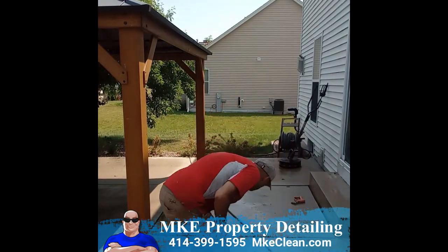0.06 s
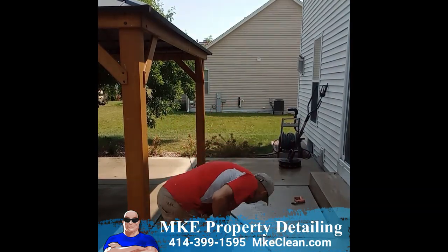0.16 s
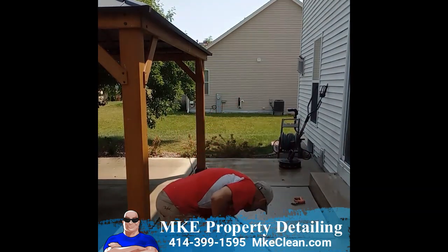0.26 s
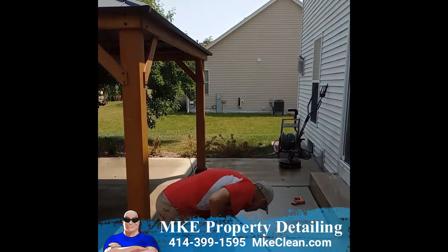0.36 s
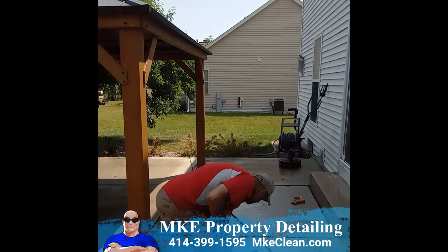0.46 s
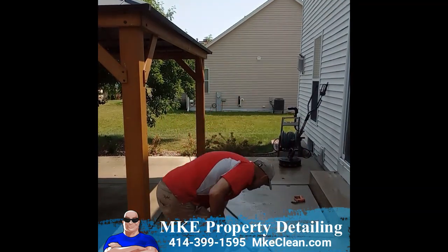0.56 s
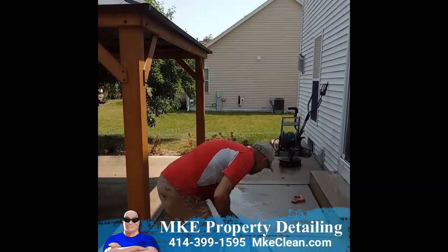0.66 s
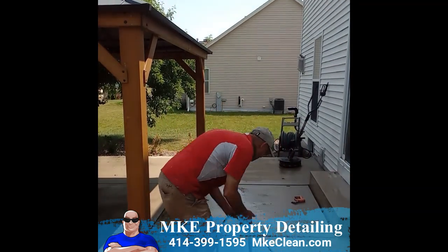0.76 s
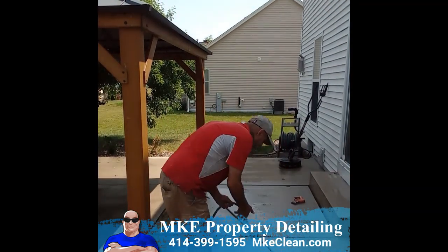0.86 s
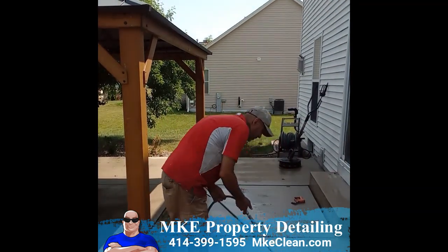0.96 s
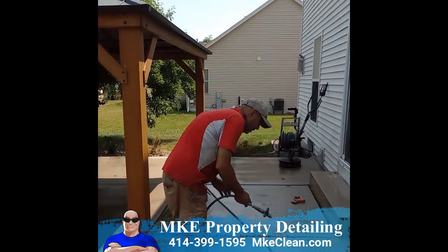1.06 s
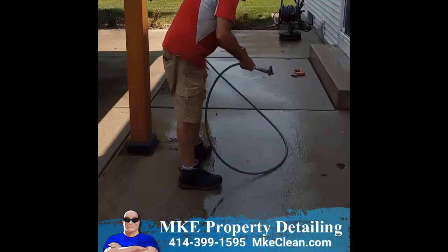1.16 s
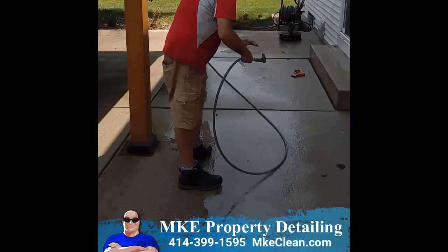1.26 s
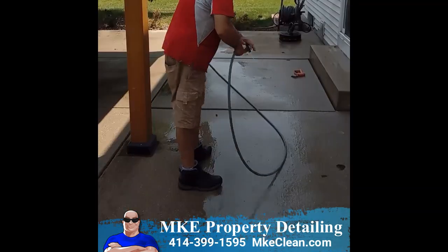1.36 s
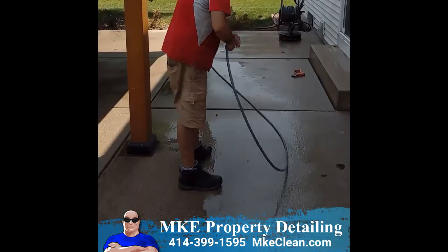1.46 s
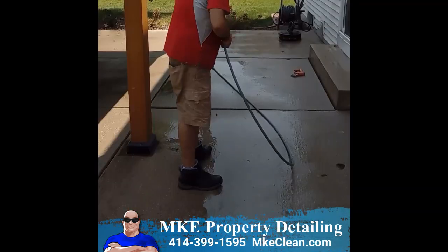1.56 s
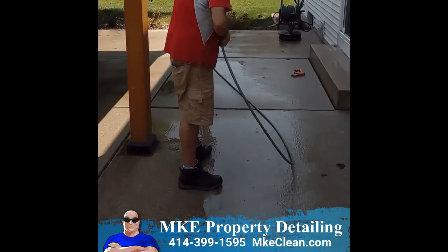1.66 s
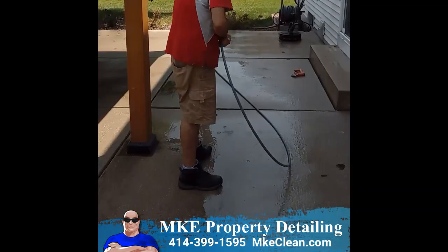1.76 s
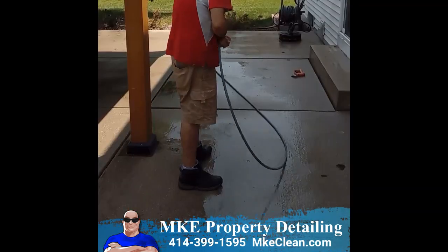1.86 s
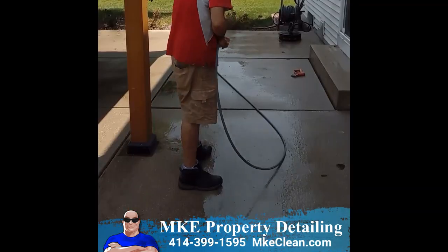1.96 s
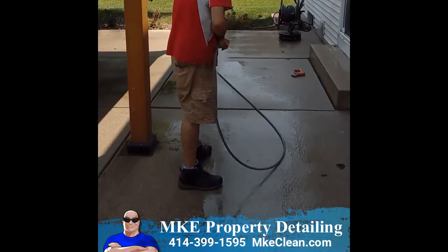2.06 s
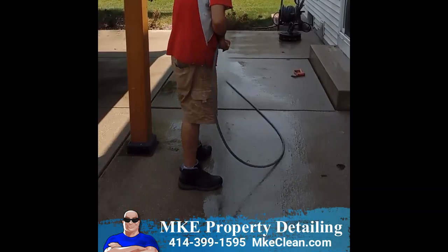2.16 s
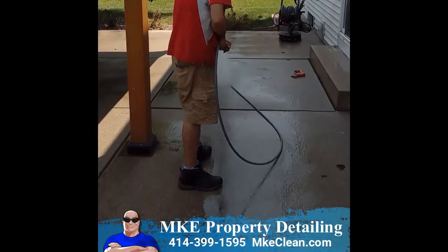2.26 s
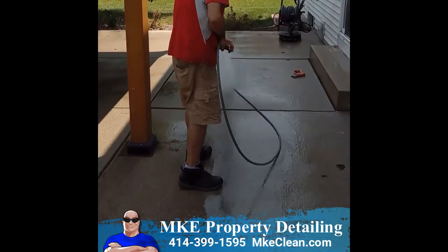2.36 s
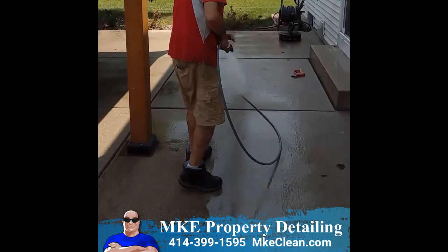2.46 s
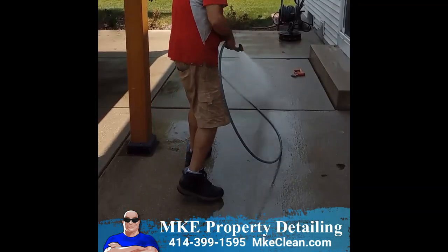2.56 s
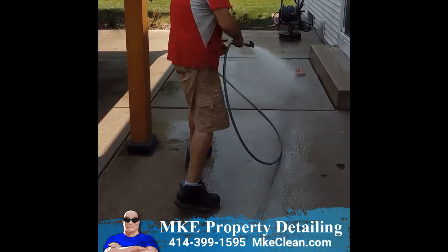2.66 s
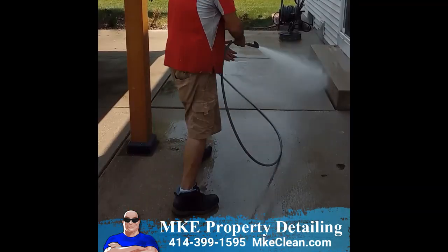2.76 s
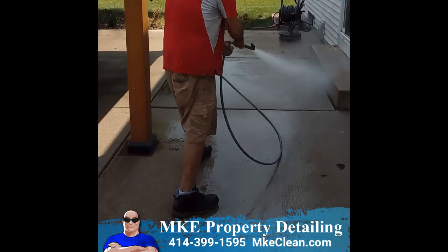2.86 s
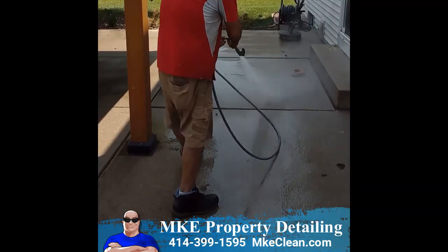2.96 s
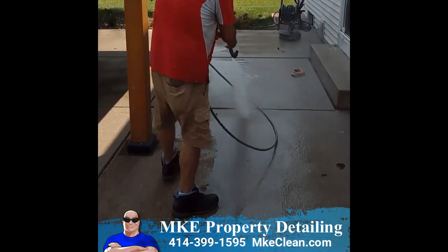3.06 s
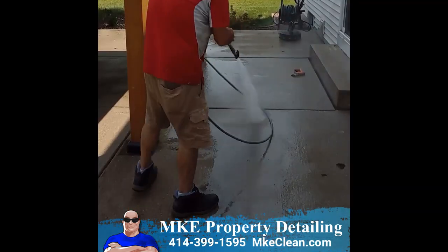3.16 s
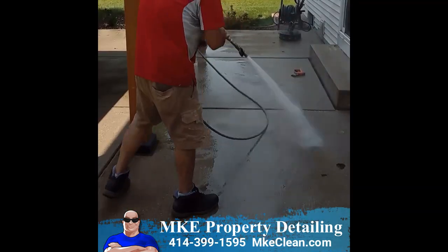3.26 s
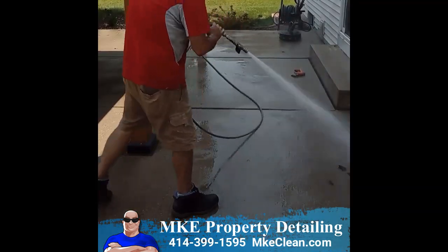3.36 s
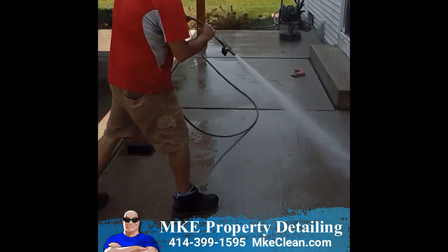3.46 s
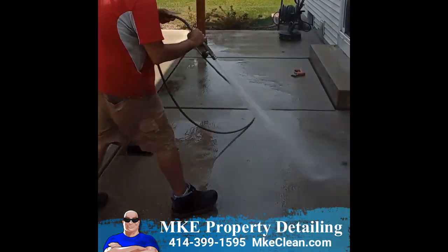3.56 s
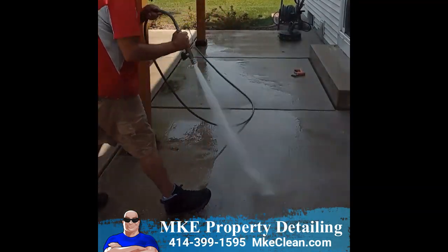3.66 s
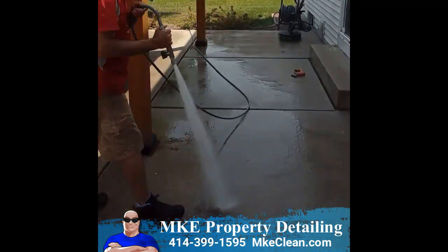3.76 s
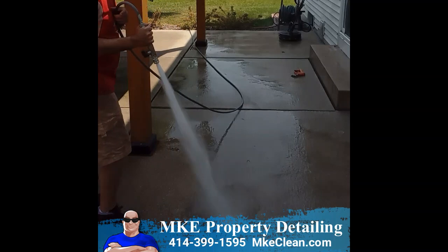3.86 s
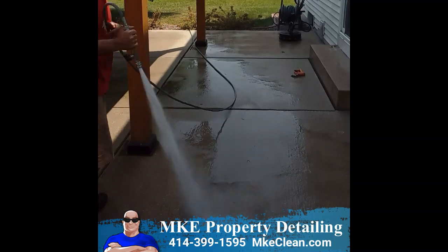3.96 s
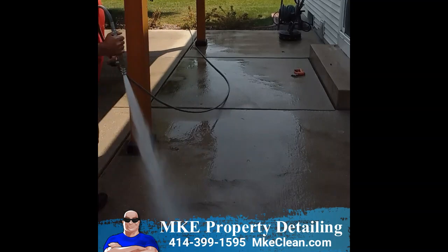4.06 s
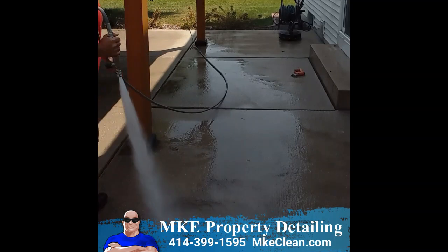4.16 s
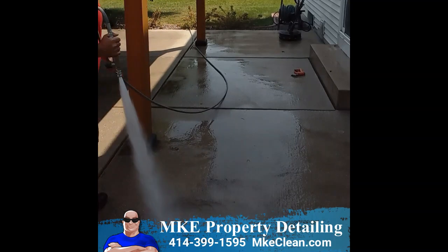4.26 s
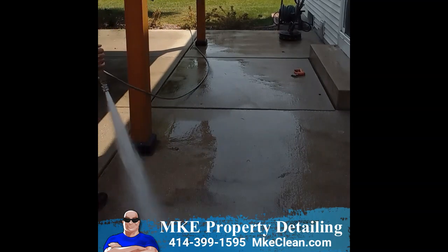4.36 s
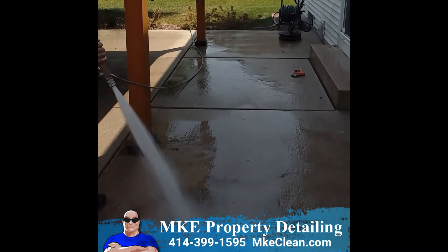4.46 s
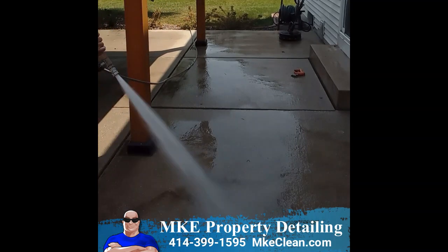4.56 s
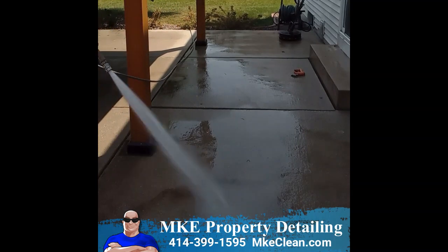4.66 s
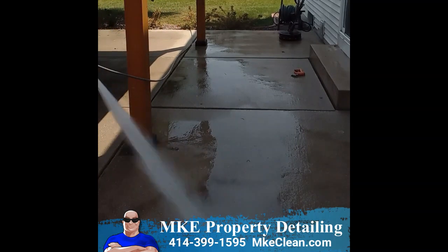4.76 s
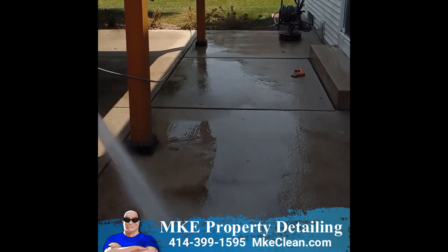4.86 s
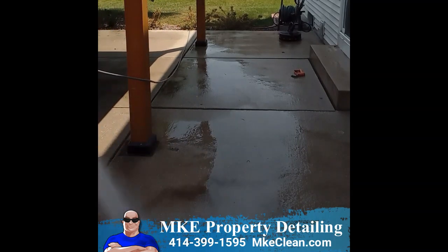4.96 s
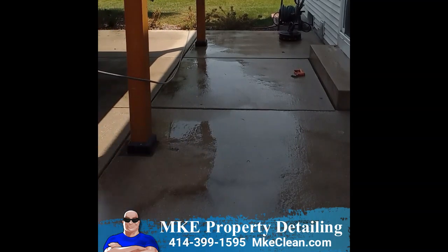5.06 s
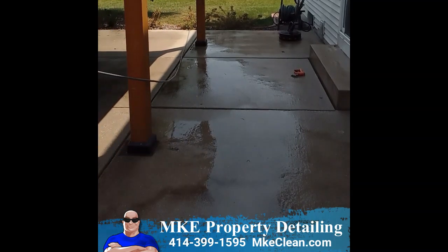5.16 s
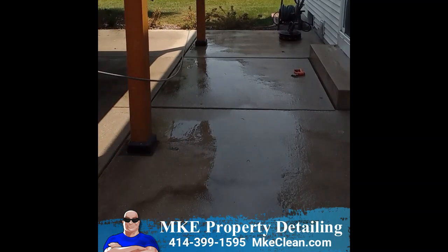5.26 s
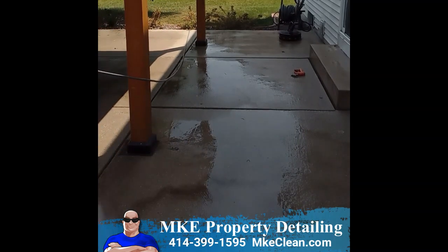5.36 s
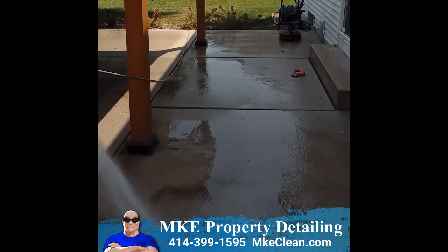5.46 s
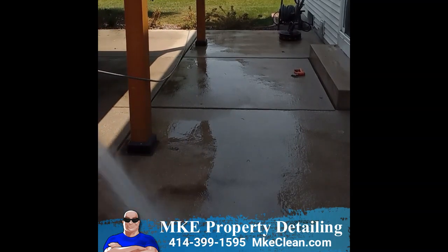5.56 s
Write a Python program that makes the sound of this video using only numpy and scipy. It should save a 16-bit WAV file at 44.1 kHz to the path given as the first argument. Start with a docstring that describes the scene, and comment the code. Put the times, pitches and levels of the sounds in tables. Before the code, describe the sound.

Wind thumps and knocks on a microphone over a soft water hiss, then a hose jet bursts open and sprays a concrete patio.

```python
"""A wet concrete patio outdoors, rinsed by a spray gun on a hose: a soft hiss, then the full jet opens and sweeps the slab.
The water is noise mixed with single impacts, coloured as nozzle hiss, splash, mist and a deep drumming.
Delayed copies off the ground, a wall and a post make the spray sound hollow as the nozzle moves.
Gusts of low noise and single swings knock on the two microphone ports; a faint motor of three sines hums
far away, and short puffs of noise are scuffs close by."""
import sys
import numpy as np
from scipy import signal
from scipy.fft import rfft, irfft, next_fast_len
from scipy.io import wavfile
from scipy.ndimage import uniform_filter1d, map_coordinates

SR = 44100
rng = np.random.default_rng(int(sys.argv[2]) if len(sys.argv) > 2 else 0)


def transcribe(u):
    """Save the signal u as a 16-bit wav file named by the first command-line argument.

    u: samples, shape (n,) or (channels, n), limited to [-1, 1]; the rate is SR.
    q: integer samples, one column per channel.
    """
    v = np.clip(np.atleast_2d(u).T, -1, 1)
    q = np.round(v * 32767).astype(np.int16)
    wavfile.write(sys.argv[1], SR, q)


N = 247842

# Colour of the outdoor air. Each row: frequency in Hz, relative level in dB per Hz.
AIR_COLOUR = [(20, -54), (100, -6), (300, -7), (700, -6), (2000, -23), (15000, -28.5)]
# Tones of the far motor. Each row: frequency in Hz, rms level in dB.
MOTOR_TONES = [(179, -60.5), (298, -61.5), (417, -61)]
# Brief scuffs close by. Each row: middle in seconds, length in seconds, level in dB, pitch in Hz.
SCUFFS = [(0.005, 0.019, -35, 597), (0.037, 0.049, -42.5, 760), (0.056, 0.039, -43, 534),
          (0.267, .016, -32, 600), (0.452, 0.0218, -42, 740), (0.467, 0.0134, -49, 834)]

# The breeze between gusts, before its lumps and left-right offset. Each row: time in seconds, level in dB.
BREEZE_LEVEL = [(0, -37), (.4, -28.5), (.55, -41.5), (1.2, -31), (1.45, -47.5), (2.6, -51.5), (3.0, -75),
                (5.62, -59)]
# Colour of the breeze. Each row: frequency in Hz, relative level in dB per Hz.
BREEZE_COLOUR = [(20, -32), (45, -12), (75, 6.5), (130, 5.5), (220, -13.5), (400, -28), (1000, -68)]
# Gusts of wind. Each row: start in seconds, length in seconds, left level in dB, right level in dB.
GUSTS = [(.1, 0.13, -23.5, -49), (0.238, 0.056, -15.5, -30), (0.278, 0.073, -26.5, -25),
         (0.383, 0.13, -18, -31.5), (0.59, 0.11, -22, -26), (0.692, .11, -36, -22),
         (0.874, 0.095, -29, -21.5), (0.926, 0.16, -48, -17), (1.132, 0.11, -24, -32),
         (1.242, 0.14, -28, -43), (1.796, .045, -36, -53), (2.083, 0.061, -32.5, -58),
         (2.159, 0.059, -29.5, -58), (2.389, 0.14, -29.5, -39), (2.647, 0.088, -31.5, -41),
         (2.787, 0.041, -25.5, -42), (4.99, 0.043, -37.5, -60)]
# The hardest eddies, each a single knock. Each row: middle in seconds, pitch of the swing in Hz,
# strength in dB before the swing is shaped, share on the right port from 0 to 1.
KNOCKS = [(0.265, 260, -2, 0.076), (0.413, 110, -13, 0.94), (0.441, 287, -7, 0.022), (.736, 292, -17.5, 1),
          (0.815, 130, -9.5, 1), (.998, 179, -8, 1), (2.381, 197.5, -3.5, 0.01), (2.427, 240, -12, 0)]

# Water drumming on the slab as the jet comes near. Each row: time in seconds, level in dB.
DRUMMING_LEVEL = [(0, -67), (2.0, -58), (2.3, -78), (3.2, -53), (3.8, -47.5), (4.5, -50), (5.1, -47),
                  (5.62, -51.5)]
# Colour of the drumming. Each row: frequency in Hz, relative level in dB per Hz.
DRUMMING_COLOUR = [(30, -39), (70, 2), (130, 4), (220, 4), (400, -3), (600, -6), (1100, -41), (3000, -50)]

# Strength of the water while it trickles. Each row: time in seconds, level in dB.
TRICKLE_FLOW = [(0.0, -41), (0.244, -45), (0.27, -47.5), (0.352, -44.5), (0.362, -50.5), (0.504, -50),
                (0.548, -42.5), (0.782, -43.5), (0.824, -47), (0.858, -44), (1.618, -44), (1.95, -49)]
# Strength of the water from just before the full jet opens. Each row: time in seconds, level in dB.
JET_FLOW = [(2.02, -45.5), (2.08, -32.5), (2.1, -37.5), (2.18, -21.5), (2.46, -17.5), (2.48, -17),
            (2.69, -15.5), (2.71, -14), (2.93, -16), (2.95, -19), (3.27, -22), (4.25, -22), (4.47, -22.5),
            (4.79, -20.5), (5.05, -23), (5.43, -23), (5.62, -21.5)]
# Where the jet is aimed sets the mix. Each row: time in seconds, splash in dB, mist in dB, both next to the flow.
AIM = [(0, -3, -12), (.13, -9, -23), (.45, -5, -13), (.6, -7.5, -22), (.92, -13.5, -7.5), (1.9, -8.5, -17),
       (2.25, -9, -10.5), (2.8, -12.5, -10.5), (3.0, -12, -19.5), (3.4, -16.5, -10), (4.3, -13, -12),
       (5.62, -15.5, -10)]
# Colour of the hiss when trickling. Each row: frequency in Hz, relative level in dB per Hz.
TRICKLE_COLOUR = [(590, -45), (1000, -76), (1140, -5.5), (1480, -2), (2090, -5.5), (2290, -4.5), (2930, -1),
                  (5230, -2), (7350, -13.5), (9000, -24), (11700, -43), (19800, -120)]
# Colour of the hiss at full blast. Each row: frequency in Hz, relative level in dB per Hz.
BLAST_COLOUR = [(590, -32.5), (1000, -22), (1540, -11), (1700, -8), (2310, -5), (2910, -5.5), (3130, -1.5),
                (3370, -5), (4860, -2.5), (8290, -20.5), (9000, -21), (11700, -38), (19800, -120)]
# Colour of the hiss when sweeping the slab. Each row: frequency in Hz, relative level in dB per Hz.
SWEEP_COLOUR = [(590, -74), (1000, -16.5), (1390, -12), (1820, -5.5), (2270, -5.5), (3270, -2.5),
                (3790, -3.5), (4270, -3), (5630, -2), (7990, -18.5), (9000, -17), (11700, -26.5),
                (19800, -120)]
# Colour of the splash on the slab. Each row: frequency in Hz, relative level in dB per Hz.
SPLASH_COLOUR = [(100, -20.5), (300, -18.5), (450, -3.5), (620, -2.5), (900, -0.5), (1300, 1.5),
                 (1800, 0.5), (3000, -2.5), (6000, -43)]
# Colour of the fine mist. Each row: frequency in Hz, relative level in dB per Hz.
MIST_COLOUR = [(4500, -12), (7000, 3.5), (8300, -4.5), (10500, -2), (12500, -3.5), (13900, -13), (14600, 3),
               (15600, -1)]
# Hollow peaks and dips that slide through the hiss as the nozzle turns. Each row: start in seconds,
# length in seconds, first centre in Hz, last centre in Hz, width in Hz, lift in dB (negative for a dip).
SWISHES = [(0, .11, 5700, 5350, 696, 8), (.18, 0.085, 4940, 4700, 250, 17),
           (.29, 0.14, 4150, 4300, 300, 13.5), (0.476, 0.31, 2250, 1930, 220, 13.5),
           (.52, .29, 1500, 1400, 200, 9.5), (.87, 0.13, 4500, 4300, 250, 11.5),
           (0.972, 0.26, 5570, 6300, 550, 10.5), (1.004, 0.27, 3600, 2850, 150, 3),
           (1.352, 0.51, 3350, 2460, 150, 10.5), (1.36, .42, 4350, 3500, 150, 10),
           (2.017, 0.33, 2160, 2360, 323, 4.5), (2.55, 0.46, 3400, 4297, 890, 1.5),
           (2.942, 0.32, 3410, 3360, 70, 6), (3.0, .75, 700, 1400, 350, -2.5),
           (3.85, 1, 1980, 1820, 300, 1.5)]

# How much later the ground echo arrives as the nozzle moves. Each row: time in seconds, delay in ms.
GROUND_DELAY = [(0, 2.4), (.66, 2.41), (1.7, 3.53), (2.5, 3.53), (2.88, 2.92), (3.15, 3.35), (3.45, 3.38),
                (4.15, 5.42), (5.25, 6.16), (5.62, 6.15)]
# How alike the two ports are. Each row: frequency in Hz, likeness from 0 to 1.
PORT_LIKENESS = [(100, .9), (600, .92), (1300, .81), (3000, .81), (5000, .71), (8000, .4), (15000, .25)]
# Balance of the ports, before the bearing scales it. Each row: frequency in Hz, left minus right in dB.
PORT_BALANCE = [(100, 0), (700, -1), (1300, -3), (2400, 0), (4400, -3), (8100, -5), (10500, -13),
                (15000, -10)]
# Where the jet lies. Each row: time in seconds, lag of the left port in ms, factor on the balance.
BEARING = [(0, 0.072, 1.15), (.75, 0.13, 1), (1.3, 0.041, 0.98), (2.88, 0.015, .3), (3.05, 0.035, 0.72),
           (3.7, 0.016, 0.76), (4.4, 0.048, 0.9), (5.62, 0.047, 0.75)]
# Sound bends round the housing to the left port. Each row: frequency in Hz, extra lag in radians.
BEND = [(100, 0), (700, 0.37), (1300, 0.64), (2300, 0.29), (4000, 0.21), (15000, 0.19)]

TREBLE_EDGE_HZ = 15650
SIZE, HOP = 1024, 256  # samples per spectrum frame, and between frames
TIME = np.arange(N) / SR
FRAME_S = np.arange(N // HOP + 5) * HOP / SR
BIN_HZ = np.fft.rfftfreq(SIZE, 1 / SR)

BREEZE_LEFT_DB = 1.5  # added on the left, taken off on the right
BREEZE_LUMPS_DB, LUMP_S = 5, 0.11
GUST_RAMP_S, GUST_OCTAVES = .018, 0.7  # rise and fall; width of the rumble
GUST_HZ, GUST_DB_PER_OCTAVE = 108.3, 25  # pitch of a gust of -22.5 dB; harder gusts sound higher
OPENS_S, OPENING_S = 2.28, 0.25  # the nozzle opens: middle and length
TURNS_S, TURNING_S = 3.62, 1  # the jet turns to sweep the slab: middle and length
FAR_SPLASH_HZ, FAR_SPLASH_CUT_DB = 503, 10.5  # splash that lands far off has little low end
GROUND_ECHO, ECHO_FALL = 0.59, 0.39  # strength at a delay of 3 ms, and the power by which it falls with delay
WALL_PATH, WALL_ECHO = .73, 0.23  # shares of the ground echo's delay and strength
WALL_SKEW_MS = 0.15  # the wall is to the side, so the left port hears its echo first
POST_S, POST_PASS_S, POST_MS, POST_ECHO = 4.11, 0.16, 1.147, 0.7  # a short echo as the nozzle passes a post


def amp(db):
    """Turns decibels into gain."""
    return 10 ** (np.asarray(db) / 20)


def unit(x):
    """Scales to rms 1."""
    return x / np.sqrt(np.mean(x ** 2) + 1e-20)


def at_hz(points, hz):
    """Reads a spectrum on a log-frequency axis."""
    f, value = np.transpose(points)
    return np.interp(np.log(hz + 1), np.log(np.abs(f) + 1), value)


def at_time(rows, t):
    """Reads every column of a table that changes over time."""
    s, *columns = np.transpose(rows)
    return [np.interp(t, s, c) for c in columns]


def ramp(t, middle_s, length_s):
    """Goes from 0 to 1 around a moment."""
    return np.clip((t - middle_s) / length_s + .5, 0, 1)


def stages(t, trickle, blast, sweep):
    """Blends a property of the water from trickle to blast to sweep."""
    opened = ramp(t, OPENS_S, OPENING_S)
    turned = ramp(t, TURNS_S, TURNING_S)
    full_jet = (1 - turned) * blast + turned * sweep
    return (1 - opened) * trickle + opened * full_jet


def wander(length_s):
    """A slow random curve at rms 1, drawn as straight lines between random values."""
    return unit(np.interp(TIME / length_s, np.arange(600), rng.standard_normal(600)))


def patches(length_s, width_hz):
    """A smooth random field over frames and bins, at rms 1."""
    field = rng.standard_normal((len(FRAME_S), len(BIN_HZ)))
    for axis, span in enumerate([length_s * SR / HOP, width_hz * SIZE / SR]):
        slowness = np.fft.fftfreq(field.shape[axis]) * span
        smoothing = np.expand_dims(np.exp(-2 * slowness ** 2), 1 - axis)
        field = np.fft.ifft(np.fft.fft(field, axis=axis) * smoothing, axis=axis).real
    return unit(field)


def coloured(x, points):
    """Gives a sound a fixed spectrum, at rms 1."""
    size = next_fast_len(N)
    gain = amp(at_hz(points, np.fft.rfftfreq(size, 1 / SR)))
    return unit(irfft(rfft(x, size) * gain, size)[..., :N])


def noise_band(noise, hz, octaves):
    """Keeps a bell-shaped band of noise around hz."""
    f = np.fft.rfftfreq(noise.shape[-1], 1 / SR) + 1
    return irfft(rfft(noise) * np.exp(-.5 * (np.log2(f / hz) / octaves) ** 2))


def add(mix, middle_s, sound):
    """Mixes a sound in, centred on a moment."""
    first = max(0, round(middle_s * SR - sound.shape[-1] / 2))
    part = mix[:, first:][:, :sound.shape[-1]]
    part += sound[..., :part.shape[1]]


def puff(length_s, hz, octaves):
    """A short swell of noise around one pitch, at rms 1."""
    count = int(length_s * SR)
    band = noise_band(rng.standard_normal(8192), hz, octaves)[:count]
    return unit(band * signal.windows.tukey(count, .7))


def motor():
    """Steady tones of a far motor, whose pitches waver together."""
    waver = unit(np.interp(TIME, np.linspace(0, TIME[-1], 30), rng.standard_normal(30)))
    turns = np.cumsum(1 + 0.0054 * waver) / SR
    hum = np.zeros(N)
    for hz, db in MOTOR_TONES:
        hum += amp(db) * np.sqrt(2) * np.sin(2 * np.pi * (hz * turns + rng.random()))
    return hum


def yard():
    """Outdoor air is steady noise; the motor hums in it, and scuffs are short puffs of noise."""
    air = amp(-52.0) * coloured(rng.standard_normal((2, N)), AIR_COLOUR)
    out = air + motor()
    for s, length_s, db, hz in SCUFFS:
        add(out, s, amp(db) * puff(length_s, hz, octaves=0.24))
    return out


def gust(length_s, db):
    """Low turbulence at one port: it rises, holds and falls, higher in pitch the harder it blows."""
    hz = GUST_HZ * 2 ** ((db + 22.5) / GUST_DB_PER_OCTAVE)
    t = np.arange(0, length_s, 1 / SR)
    rumble = noise_band(rng.standard_normal(SR // 2), hz, GUST_OCTAVES)[:len(t)]
    to_edge_s = np.minimum(t, length_s - t)
    swell = np.sin(np.pi / 2 * np.clip(to_edge_s / GUST_RAMP_S, 0, 1)) ** 2
    return amp(db) * unit(swell * rumble)


def knock(hz, db, right):
    """A hard eddy pushes the membrane in one quick swing: a sine inside a narrow bell."""
    cycles = np.arange(-1000, 1000) / SR * hz
    swing = np.sin(2 * np.pi * cycles) * np.exp(-.5 * (cycles / 0.4) ** 2)
    return amp(db) * np.array([[1 - right], [right]]) * swing


def wind():
    """Gusts hit each port on their own, over a lumpy breeze, with knocks from the hardest eddies."""
    breeze_db, = at_time(BREEZE_LEVEL, TIME)
    ports_db = [breeze_db + side * BREEZE_LEFT_DB + BREEZE_LUMPS_DB * wander(LUMP_S) for side in (1, -1)]
    out = amp(ports_db) * coloured(rng.standard_normal((2, N)), BREEZE_COLOUR)
    for start_s, length_s, left_db, right_db in GUSTS:
        ports = np.array([gust(length_s, left_db), gust(length_s, right_db)])
        add(out, start_s + length_s / 2, ports)
    for s, hz, db, right in KNOCKS:
        add(out, s, knock(hz, db, right))
    return out


def drops(per_s, spread_db, share):
    """Two streams of water noise: a smooth rush mixed with single impacts of uneven size."""
    size = amp(spread_db * np.minimum(rng.exponential(1, (2, N)), 4.5))
    signed = size * rng.choice([-1, 1], (2, N))
    impacts = unit(signed * (rng.random((2, N)) < per_s / SR))
    rush = rng.standard_normal((2, N))
    return np.sqrt(share) * impacts + np.sqrt(1 - share) * rush  # share of the power in impacts


def at_ports(streams, colour_db):
    """Colours two streams and shares them between the ports by lag and balance, with the mid kept near rms 1."""
    padded = np.pad(streams, ((0, 0), (0, 2 * SIZE)))
    spectra = signal.stft(padded, nperseg=SIZE, noverlap=SIZE - HOP)[2]
    a, b = spectra.transpose(0, 2, 1)[:, :len(FRAME_S)]
    same = np.clip(at_hz(PORT_LIKENESS, BIN_HZ), 0, 1)
    lag_ms, side = at_time(BEARING, FRAME_S[:, None])
    # each port has its own notches
    uneven_db = stages(FRAME_S[:, None], 5.4, 4.6, 0.84) * patches(length_s=0.1, width_hz=87)
    lean = amp((side * at_hz(PORT_BALANCE, BIN_HZ) + uneven_db) / 2)
    late = np.exp(-1j * (2 * np.pi * BIN_HZ * lag_ms / 1000 + at_hz(BEND, BIN_HZ)))
    left = a * lean * late
    right = (same * a + np.sqrt(1 - same ** 2) * b) / lean
    z = np.array([left, right]) * amp(colour_db)
    x = signal.istft(z.transpose(0, 2, 1), nperseg=SIZE, noverlap=SIZE - HOP)[1][:, :N]
    mid_power = uniform_filter1d(x.mean(0) ** 2, size=16000)
    return x / np.sqrt(mid_power + 1e-20)


def drumming():
    """Heavy drops thud and gurgle on the wet concrete: sparse impacts in low, restless noise."""
    level_db, = at_time(DRUMMING_LEVEL, TIME)
    gurgle_db = 2.7 * patches(length_s=0.023, width_hz=390)
    water = drops(per_s=610, spread_db=7.5, share=0.26)
    return amp(level_db) * at_ports(water, at_hz(DRUMMING_COLOUR, BIN_HZ) + gurgle_db)


def ripple(length_s, width_hz):
    """Peaks and notches of scattered sound; they glide down as paths lengthen and leave the broad colour alone."""
    field = patches(length_s, width_hz)
    field = field - uniform_filter1d(field, size=21, axis=1)
    path_ms, = at_time(GROUND_DELAY, FRAME_S[:, None])
    frame, column = np.indices(field.shape)
    stretch = (path_ms / path_ms.mean()) ** .5
    return unit(map_coordinates(field, [frame, column * stretch], order=1, mode="mirror"))


def swishes():
    """Each swish swells, glides and fades: dB over frames and bins."""
    lift_db = 0
    for start_s, length_s, first_hz, last_hz, width_hz, db in SWISHES:
        u = np.clip((FRAME_S[:, None] - start_s) / length_s, 0, 1)
        centre_hz = first_hz + (last_hz - first_hz) * u
        swell = np.sqrt(np.abs(np.sin(np.pi * u)))
        lift_db = lift_db + db * swell * np.exp(-.5 * ((BIN_HZ - centre_hz) / width_hz) ** 2)
    return lift_db


def nozzle_hiss(shimmer_db):
    """Water forced through the nozzle: dense noise whose colour follows the strength and turning of the jet."""
    colours = [at_hz(points, BIN_HZ) for points in (TRICKLE_COLOUR, BLAST_COLOUR, SWEEP_COLOUR)]
    colour_db = stages(FRAME_S[:, None], *colours) + swishes()
    water = drops(per_s=5000, spread_db=3.5, share=0.28)
    return amp(-0.1) * at_ports(water, colour_db + shimmer_db)


def slab_splash(level_db, shimmer_db):
    """Water breaking on the slab: fewer impacts, with the low end thinned during the blast."""
    slosh_db = 1.2 * wander(length_s=0.076)  # the jet meets puddles and bare slab
    far = stages(FRAME_S[:, None], 0, 0.92, 0)
    thin_db = FAR_SPLASH_CUT_DB * far / (1 + (BIN_HZ / FAR_SPLASH_HZ) ** 10)
    water = drops(per_s=2500, spread_db=2.5, share=0.28)
    return amp(level_db + slosh_db) * at_ports(water, at_hz(SPLASH_COLOUR, BIN_HZ) - thin_db + shimmer_db)


def fine_mist(level_db, shimmer_db):
    """Tiny drops: bright noise that comes in uneven spurts."""
    spurts_db = 0.62 * patches(length_s=0.022, width_hz=13000)
    water = drops(per_s=6300, spread_db=3.5, share=0.16)
    return amp(level_db) * at_ports(water, at_hz(MIST_COLOUR, BIN_HZ) + spurts_db + shimmer_db)


def spray():
    """Nozzle hiss, splash and mist follow one flow, and flutter as the jet breaks up."""
    flow_db, = at_time(list(TRICKLE_FLOW) + list(JET_FLOW), TIME)
    splash_db, mist_db = at_time(AIM, TIME)
    flutter_db = 0.7 * patches(length_s=0.045, width_hz=3600) + patches(length_s=0.025, width_hz=400)
    # scattered paths drift in and out of step, most of all while the weak jet is a small source
    broad_db = stages(FRAME_S[:, None], 2.6, 1.4, 1.3) * ripple(length_s=.065, width_hz=170)
    ripple_db = broad_db + 2.9 * ripple(length_s=.11, width_hz=24)
    hiss = nozzle_hiss(flutter_db + ripple_db)
    splash = slab_splash(splash_db, flutter_db + 1.37 * ripple_db)
    mist = fine_mist(mist_db, flutter_db + ripple_db)
    return amp(flow_db + 0.02) * (hiss + splash + mist)


def echo(x, delay_ms, dull_hz, skew_ms=0):
    """A delayed copy of the spray; rough surfaces scatter its treble."""
    places = [np.arange(N) - (delay_ms + side * skew_ms / 2) * SR / 1000 for side in (-1, 1)]
    dull = signal.sosfiltfilt(signal.butter(1, dull_hz, fs=SR, output="sos"), x)
    return np.array([map_coordinates(c, [place], order=3) for c, place in zip(dull, places)])


def patio(water):
    """Echoes off the ground, a wall and a post comb the spray; longer ground paths are weaker."""
    path_ms, = at_time(GROUND_DELAY, TIME)
    strength = GROUND_ECHO * (3 / path_ms) ** ECHO_FALL
    ground = echo(water, path_ms, dull_hz=7400)
    wall = WALL_ECHO * echo(water, WALL_PATH * path_ms, dull_hz=4800, skew_ms=WALL_SKEW_MS)
    passing = np.exp(-.5 * ((TIME - POST_S) / POST_PASS_S) ** 2)
    post = POST_ECHO * passing * echo(water, POST_MS, dull_hz=4870)
    return water + strength * (ground + wall) + post


def scene():
    """The yard, the wind, and water on the patio."""
    return yard() + wind() + drumming() + patio(spray())


def record(dry):
    """The microphone's low cut, then a steep limit on the treble."""
    thinned = signal.sosfilt(signal.butter(2, 36, "highpass", fs=SR, output="sos"), dry)
    treble_limit = signal.firwin(1023, TREBLE_EDGE_HZ, window=("kaiser", 9), fs=SR)
    return signal.oaconvolve(thinned, treble_limit[None], "same", axes=1)


dry = scene()
out = record(dry)
transcribe(out)
```